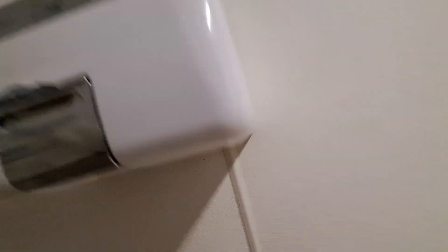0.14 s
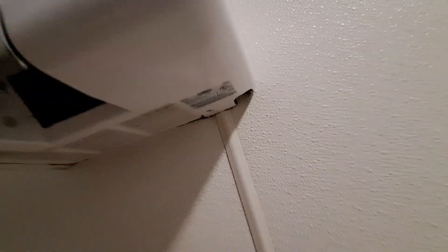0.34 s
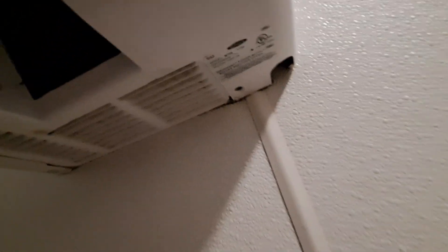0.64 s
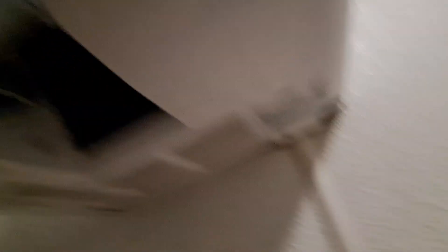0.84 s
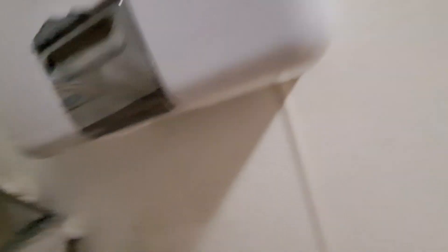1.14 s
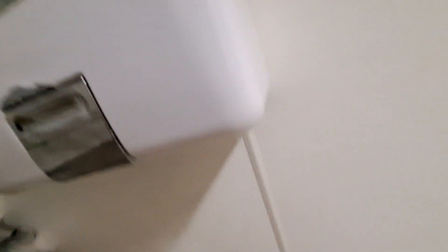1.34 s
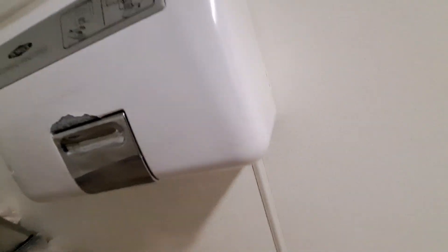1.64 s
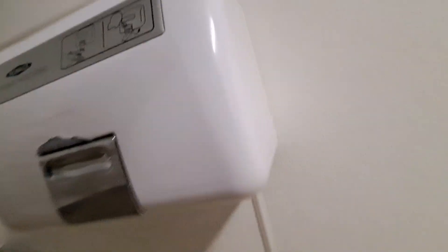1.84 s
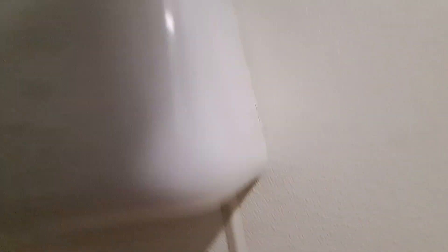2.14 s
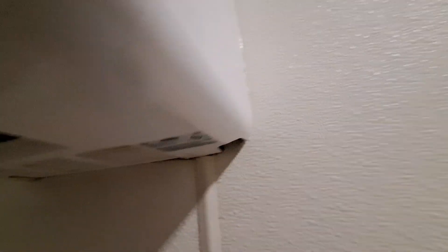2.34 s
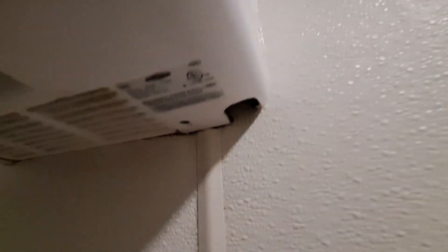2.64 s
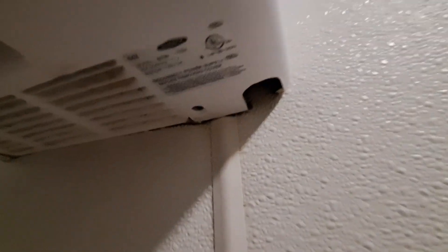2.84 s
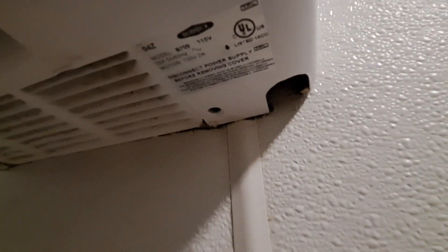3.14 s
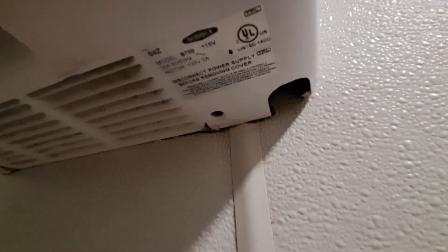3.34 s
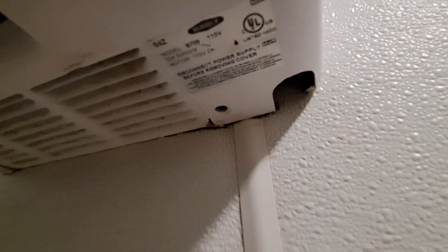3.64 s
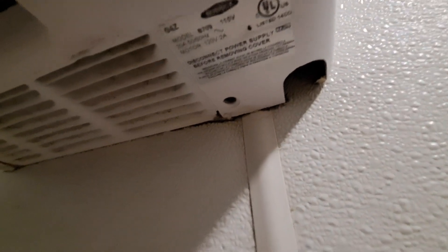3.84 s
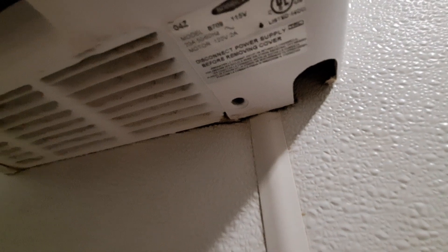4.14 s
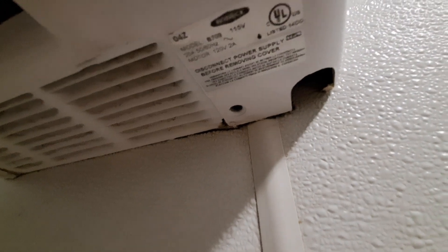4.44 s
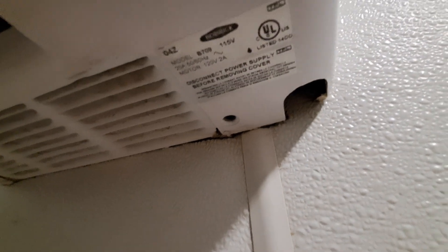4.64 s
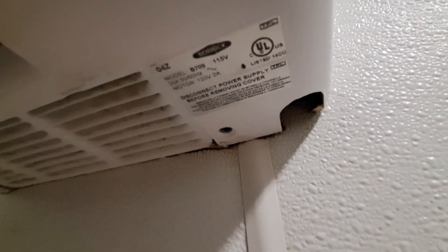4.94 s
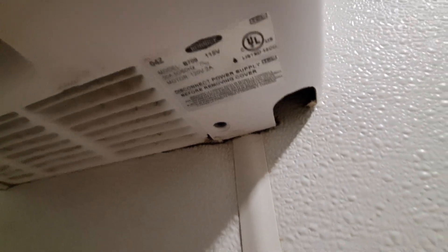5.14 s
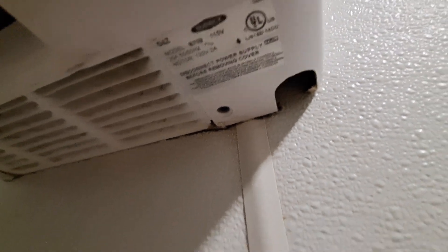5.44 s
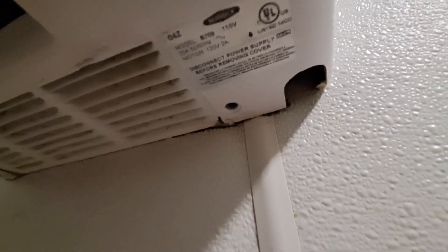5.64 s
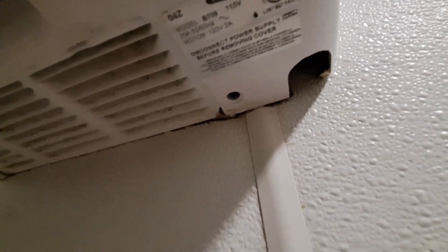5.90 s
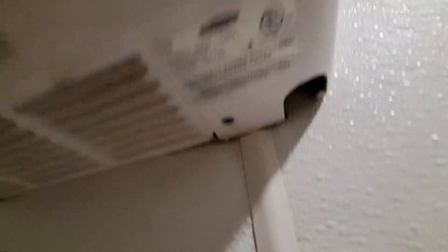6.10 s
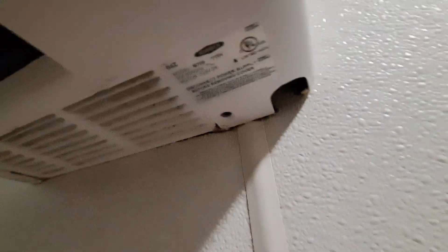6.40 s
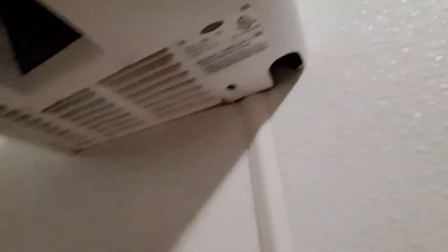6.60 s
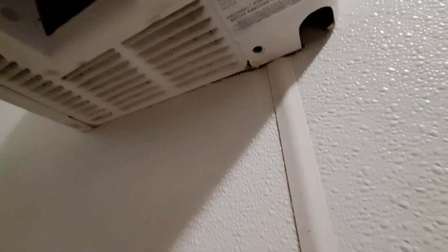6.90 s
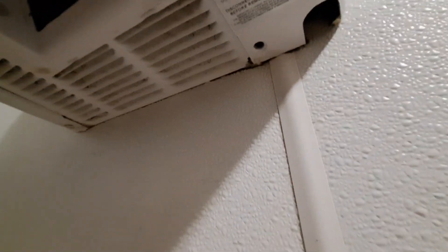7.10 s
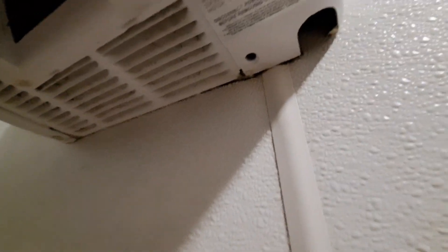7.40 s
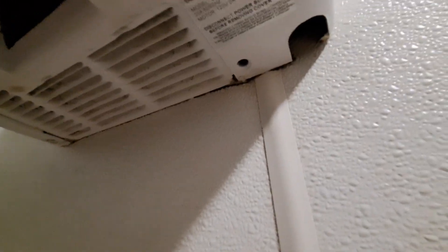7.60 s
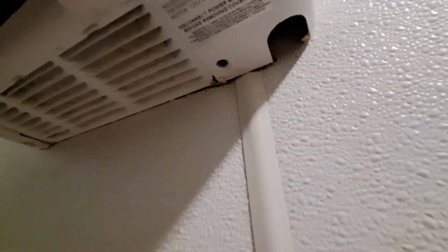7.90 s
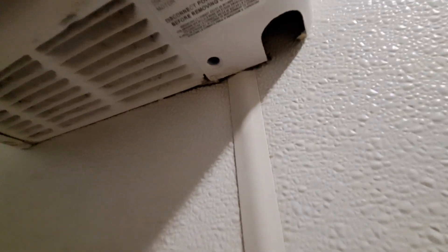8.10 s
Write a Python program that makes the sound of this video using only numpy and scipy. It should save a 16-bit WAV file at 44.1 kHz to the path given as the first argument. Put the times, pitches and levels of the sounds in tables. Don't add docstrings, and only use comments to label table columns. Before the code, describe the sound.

A restroom's steady fan drone is knocked by two handling taps before a wall dryer abruptly starts. Its turbulent jet and electric hum shift in tone as the handheld microphone moves near the outlet. The air collapses into a soft, sinking rush with thin rhythmic scrapes slowing down, leaving fan and vent louder. A second sudden start brings a fuller whistle and roar, then another slowdown.

```python
import sys
import numpy as np
from scipy import signal
from scipy.fft import rfft, irfft
from scipy.io import wavfile
from scipy.ndimage import uniform_filter1d

SR = 44100
rng = np.random.default_rng(int(sys.argv[2]) if len(sys.argv) > 2 else 0)


def to_wav(sig):
    pcm = np.clip(np.atleast_2d(sig), -1, 1) * 32767
    pcm = np.round(pcm).astype(np.int16)
    wavfile.write(sys.argv[1], SR, pcm.T)


def attenuation_scalar(level_db):
    decades = np.asarray(level_db, float) / 20
    return 10 ** decades


N = 364266
SIZE, HOP = 2048, 512
HZ = np.fft.rfftfreq(SIZE, 1 / SR)
FRAME_S = np.arange(N // HOP + 5) * HOP / SR
T = np.arange(N) / SR

# frequency in Hz, level in dB per Hz.
VENT_COLOUR_DB = [(15, -34), (25, -28), (123, -13), (148, -8.5), (174, -17), (351, -16.5), (447, -13),
                  (601, -23), (901, -34), (1310, -35), (2190, -47.5), (4920, -46), (8900, -58.5),
                  (12600, -61), (15700, -64)]
# frequency in Hz, left minus right in dB.
VENT_SIDE_DB = [(60, 11), (110, 10), (200, 5), (380, 5), (700, -2.5), (1290, -5), (2380, -8), (4400, -22),
                (8120, -9.5), (15000, -2)]
# frequency in Hz, likeness 0-1, left lead in ms.
VENT_PORTS = [(30, 0.63, 0.27), (200, 0.99, -0.022), (600, 0.81, -0.36), (1200, 0.37, -0.31),
              (3930, 0.22, -0.37), (12100, 0.11, -0.25)]
# frequency in Hz, width in Hz, level in dB.
GRILLE_MODES = [(91, 30, -2), (195, 32, -5), (9070, 1300, -8.0), (12400, 1400, 4), (734, 170, 6.5),
                (996, 114, -8.0), (1920, 180, 3.5), (3200, 990, -3.0), (15500, 1500, -6)]
# level in dB, share of the gain change, lift in the draught in dB.
VENT_LAYERS = [
    (-39, 0.63, 4),
    (-43, 1.26, 11),
    (-56, 0.76, 13),
]
DRAUGHT_END_S, DRAUGHT_FADE_S = 0.17, 0.16
# frequency in Hz, width in Hz, level in dB.
DRAUGHT_MODES = [(7200, 2800, -6.5), (12800, 2000, 6.5), (15300, 1400, 8), (11300, 900, -1)]
# start in s,
# length in s, frequency in Hz, width in Hz, level in dB.
SWING = [(0.12, .55, 7700, 1500, 6), (0.16, 0.63, 2000, 700, 5), (0.18, 0.68, 5200, 1500, -4),
         (-0.044, 0.59, 1030, 170, 7), (.2, .55, 14500, 1500, -2.5), (-0.012, 0.12, 12000, 5300, 4),
         (0.05, 0.064, 12000, 7300, -6), (.12, .1, 12500, 4000, -1)]

FAN_HZ = 24.01
# multiple of FAN_HZ, level in dB.
FAN_ORDERS_DB = [(1, -49), (2, -41), (3, -8.5), (4, -41), (5, 1.5), (6, -20.5), (7, -20.5), (8, -52),
                 (9, -20.5), (10, -8.5), (11, -15), (12, -14), (13, -15), (14, -8), (15, -10.5), (16, -43),
                 (17, -37), (18, -27.5), (19, -28), (20, -20), (21, -27), (22, -22.5), (23, -38), (24, -51),
                 (25, -14.5), (26, -28), (27, -25), (28, -24)]
# time in s, level in dB.
HUM_DB = [(0, -30.5), (.18, -26.5), (.46, -26), (.66, -25), (.85, -32), (1.4, -32), (2.0, -38), (2.65, -35),
          (2.9, -27.5), (3.86, -28.5), (4.67, -24.5), (5.3, -24), (5.9, -24.5), (6.05, -36.5), (6.6, -27.5),
          (7.4, -28.5), (7.85, -28.5), (8.26, -30.5)]
# frequency in Hz, share of the hum's level change.
HUM_FOLLOW = [(72, 1.54), (120, 1.52), (240, 2.9), (330, 1.7), (600, 0.23)]
# frequency in Hz, left minus right in dB.
HUM_SIDE_DB = [(72, 0), (120, -1.5), (240, -6), (336, 0.5), (360, -5), (600, -9)]
# start in s, length in s, fan multiple, level in dB.
STANDING_WAVES = [(3, 1.5, 6, 9), (3.2, 1.4, 11, -13), (3, 1.5, 12, -14), (3.2, 1.4, 13, -9),
                  (3, 1.3, 10, 4), (3.3, 1.3, 9, 5), (4.9, 0.99, 13, -11), (4.5, 1.4, 15, 2),
                  (4.9, 1.2, 12, 3), (4.5, 1.24, 14, -3), (-.3, 0.6, 15, 8), (-.3, .6, 10, 11),
                  (-.4, 1.4, 14, -1.5), (-.3, 0.94, 11, -3), (-0.2, .7, 12, 4.5), (-2, 1.2, 25, -5),
                  (3, 1.65, 25, -6), (0, .7, 7, -9), (1, .6, 6, -5), (5.8, .35, 10, 9), (1, 0.38, 10, 5.5)]
# time in s, level in dB.
NEAR_WALL_DB = [(0, -23), (2.9, -2), (3.4, -4.5), (4.1, -1), (4.7, 0), (5.1, 2), (5.4, 0), (5.8, -3)]
# start in s, length in s, frequency in Hz, width in Hz, level in dB.
MOAN = (4.5, 1.5, 303, 17, -39)
# frequency in Hz, width in Hz, level in dB.
GRILLE_TONES = [(1326, 8.3, -56), (1058, 20, -59)]
DUCK_S, DUCK_LENGTH_S, DUCK_DB = 0.048, 0.033, -3

# frequency in Hz, width in Hz, left minus right in dB.
RIGHT_PORT_MODES = [(3230, 690, 5.5), (6700, 2700, -9), (9930, 2740, 26), (12500, 1300, -14),
                    (15300, 1200, 10)]
# time in s, share of the cavity colour 0-1, finger over the right port in dB.
GRIP = [(0, 0.3, -5), (.6, 0.5, 3), (1.32, 0.7, 16), (1.38, 0, 11), (2.17, 0, 14), (2.22, 0.2, 0),
        (2.5, 0.8, -1), (5.8, 0.7, 5), (6.4, 0.7, 7), (6.6, 0.4, 5)]
# start in s, length in s, level in dB.
GUSTS = [(0, 0.57, -45), (6, 0.8, -34), (6.5, .5, -34), (6.5, 0.7, -32), (6.5, 0.87, -27),
         (4.5, 0.69, -50), (8, .6, -40), (4.5, 2.2, -46), (.6, 0.57, -34), (0, 0.84, -46),
         (7.5, 0.44, -30)]
CALM_DB, STIR_DB = -65, -47
# time in s, peak in dB, pitch in Hz, left minus right in dB, crack share.
TAPS = [
    (.0615, -5, 1300, 26, .17),
    (.0608, -21, 544, 23, 0),
    (.0614, -20, 3300, 20, 0),
    (.0616, -21, 5000, 20, 0),
    (.0737, -19, 1100, -3, 0),
    (.0743, -20, 4480, -6, 0),
    (.0757, -21, 1800, -3, 0),
    (.603, -26, 600, 0, .05),
    (5.86, -20, 800, 0, .052),
]

STARTS_S = [
    .603,
    5.858,
]
COASTS_S = [
    2.764,
    7.66,
]
STOPS_S = [
    3.32,
    7.78,
]
# start in s, length in s, level in dB.
FALTERS = [(5.955, 0.027, -2)]
SPIT_DELAY_S, SPIT_DB = [.011, .014], [-21, -22]

# time in s, level in dB.
SCRAPE_DB = [(2.95, -47), (3.15, -42), (3.4, -41.5), (3.8, -48.5), (4.3, -54), (4.75, -55), (4.85, -75)]
# frequency in Hz, level in dB.
SCRAPE_COLOUR_DB = [(3000, -39), (7500, -18), (8500, -32), (9300, -15), (10500, -11), (11800, -18),
                    (13000, -11), (15800, -14.5)]
SECOND_COAST_LATER_S = 4.97
ROTOR_S, ROTOR_TURNS, ROTOR_DECAY_S = 3.211, 56, 1.15

# frequency in Hz, climb in Hz per s, level in dB, growth in dB per s.
EDGE_TONE = [
    (1492, 43, -42, 4.5),
    (1510, 61, -31, 0),
]
TONE_RISE_S, TONE_SAG_HZ_PER_S, TONE_FADE_DB_PER_S = 0.32, 135, 29

SHAFT_HZ, SHAFT_LAG_HZ, SHAFT_SETTLE_S, SHAFT_HEARD_S = 100.6, 38, .35, 0.52
# imbalance in dB, fifth order in dB.
SHAFT_DB = [
    (-30.5, -31),
    (-32, -30),
]
SHAFT_LINGER_S, SHAFT_UNDER_SHARE = 0.11, 0.5
COVER_HZ, COVER_WIDTH_HZ, COVER_DB = 475.5, 20, [5.5, 10.5]
# time in s, fourth order in dB, third order in dB, loose rattle in dB.
LOCK = [(.6, 3, -22, -1), (.66, -6, -20, -3.5), (.72, 2, -3, -1.5), (.8, -5, -12, -2), (.9, -1.5, -21, -5),
        (1.0, -8, -18, -4), (5.86, -11, -12, 0.5), (5.95, -17, -7, 1), (6.0, -4, -6, -6.5),
        (6.1, -3.5, -12, -5.5), (6.2, -0.5, -19, -11), (6.33, -14, -21, -3)]
# time in s, rise in s, held until s after, level in dB.
SURGES = [
    (.603, .0045, .345, -19.5),
    (5.858, .17, .4, -14.5),
]
SURGE_FALL_DB_PER_S, SURGE_FALTER_POWER = 95, 3.8
RUNNING_DB = -35

AIR_HZ = [210, 1100, 4500, 11000]
# frequency in Hz, level in dB per Hz.
JET_COLOUR_DB = [(15, -55), (25, -29), (86, -15.5), (126, -18), (210, -6.5), (324, -16), (485, -12.5),
                 (688, -14.5), (1180, -22.5), (1590, -19.5), (2870, -27.5), (4790, -22.5), (9150, -36.5),
                 (12600, -47.5), (15700, -54.5)]
# frequency in Hz, left minus right in dB.
JET_SIDE_DB = [(60, -7), (110, -5.5), (200, -7.5), (380, -8.5), (700, -13), (1290, -10), (2380, -7),
               (4400, -11), (8120, -5.5), (15000, -0.5)]
# frequency in Hz, width in Hz, level in dB.
DUCT_MODES = [(147, 28, 10), (210.2, 16.5, 9.5), (289.6, 20.7, 11), (403, 110, 5.5), (1030, 326, 8.5),
              (1304, 29, 6.5), (2320, 760, 4), (3480, 600, -2.5), (3970, 810, 3.5), (7030, 830, -2),
              (9320, 3200, -10), (12860, 1800, 6.5)]
# frequency in Hz, likeness 0-1, left lead in ms.
JET_PORTS = [(30, .3, 0), (100, .7, 0), (220, .95, .1), (400, .82, .17), (700, .64, .3), (1400, .53, .42),
             (2400, .42, .5), (5000, .28, .5), (12000, .22, .55)]
# full level in dB, short at switch-on in dB, slowing time in s, loss in dB per tenfold.
JET_LAYERS = [
    (-18, -5.5, 1, 64.5),
    (-25, -0.1, 0.5, 48),
    (-26.5, -5, 0.16, 19),
    (-30, -2, 0.2, 27),
]
SPIN_UP_S, HALT_S, HALT_DB_PER_S = 0.23, 1.8, 32
COAST_KNEE_S = 0.039
# time in s, under the housing in dB, facing the outlet in dB, turn in dB, tilt in dB.
HOLD = [(.63, -12, -4, -8, 2), (.88, 4, 1.5, -5.5, -5), (1.03, -3, 1, -18, -14), (1.27, -5, 1, -19, -17),
        (1.38, 4.5, -8, -25, 0), (1.6, 6.5, -5, -26, -1), (2.1, 2, -0.5, -20, 3), (2.27, 5, 4, -13.5, -5),
        (2.43, 9, 2, -10, 3), (2.6, 13.5, 1.5, -11, 8), (3.3, -3, 5, -11, 5.5), (4.4, 10, 3, -13, 7),
        (5.88, -8, 0.5, -12, 2), (6.2, 0.1, 1, -8, 1.5), (6.5, -1, 5, -11.5, -4.5),
        (7.35, 8.5, 4.5, -10, -3), (7.7, -1.5, 2, -12, -1), (8.26, -5, 8, -11, -3)]
UNDER_SHARE, FACING_SHARE = [0.25, -0.083, -0.012, -0.15], [0.5, -0.18, -0.13, 0.83]
RUSH_SIDE_DB, RUSH_TURN_SHARE = 0.8, 0.17
# start in s, length in s, frequency in Hz, width in Hz, level in dB.
GLANCES = [(0.9, 0.33, 1240, 330, 6.5), (0.68, 0.58, 360, 130, 5), (1.68, 0.77, 1060, 170, 5),
           (2.2, 0.77, 2300, 300, 6), (0.35, 0.7, 2400, 780, -3), (1.29, 1.25, 6900, 1200, -6),
           (0.85, 1.3, 10400, 1700, 5), (0.87, 0.56, 10200, 2100, -8), (1.36, 1.1, 13000, 1800, -7),
           (0.49, 0.51, 3880, 290, 5.5), (0.49, 0.48, 6900, 600, 6), (0.63, 0.41, 5400, 1100, -5),
           (0.53, 0.48, 1480, 320, 5.5), (0.65, 0.66, 640, 82, -8), (0.87, 0.36, 7600, 900, 5),
           (.9, 0.39, 1050, 200, 1.5), (1.06, 0.35, 3700, 500, -2.5), (1, 0.39, 2000, 500, -1.5),
           (1.3, .9, 4800, 800, 0.5), (0.76, 2.3, 3070, 1150, 3), (2.11, 0.3, 7300, 900, 8),
           (2.9, 2, 3300, 450, -6), (1.2, 0.76, 130, 64, -4), (2.09, 0.97, 1340, 190, 5.5),
           (1.64, 0.42, 198, 54, -5), (0.56, 0.18, 5300, 4500, -7.5), (0.52, .4, 3600, 300, -2),
           (.55, 0.37, 9300, 1500, 4), (0.5, 0.38, 1640, 180, -7), (2.76, 0.78, 2350, 250, 3),
           (2.4, 0.97, 7900, 1400, -4), (2.2, 1.9, 11700, 600, -2), (2.16, .8, 12600, 1500, 2.5),
           (0.9, 0.54, 275, 44, 2.5), (0.86, .4, 410, 75, 0), (3.2, 0.75, 160, 78, -8),
           (3.1, .9, 226, 30, 3), (2.62, 0.48, 720, 380, -3.5), (.72, 0.21, 190, 40, 5),
           (1.64, 0.3, 540, 200, -4.5), (0.92, 0.37, 390, 120, 2), (.8, 0.32, 275, 30, 3.5),
           (.95, .35, 1090, 60, 5)]
# start in s, length in s, frequency in Hz, width in Hz, level in dB.
LATER_GLANCES = [(5.8, 0.32, 5500, 550, 3), (5.7, 0.7, 7800, 500, -6), (5.73, .6, 9900, 1100, 4.5),
                 (5.65, .6, 12000, 1500, -5), (6.1, 1.15, 3500, 1100, 4), (6.2, 0.6, 2200, 800, 2.5),
                 (6.3, .9, 12400, 500, -4), (6.6, 1.5, 6350, 700, -4.5), (6.8, 1.1, 8400, 500, 2),
                 (6.9, 0.83, 7100, 500, 4.5), (6.9, 0.92, 15300, 1200, 4), (6.1, 1.16, 220, 23, -6),
                 (5.92, 0.72, 250, 61, 3), (5.2, 0.44, 100, 120, 4), (7.9, 1.1, 770, 190, -3),
                 (7.7, 0.68, 290, 120, 3.5), (6.24, 1.2, 580, 80, 5), (6.95, 0.59, 256, 68, -5),
                 (8.2, 0.33, 210, 54, -2), (5.75, 0.48, 3900, 680, 7), (5.8, 0.41, 2900, 1100, -5),
                 (5.3, 0.28, 1700, 1500, 5), (6.24, 0.63, 353, 82, 3.5), (7.06, 1.5, 297, 28, 7),
                 (6.95, 0.5, 150, 60, -5), (6.2, .45, 291, 80, 2.5), (6.3, 0.36, 200, 40, -4.5),
                 (6.35, 0.44, 487, 30, 5), (6.0, .35, 150, 50, 4), (6.3, .6, 160, 87, 3),
                 (7.3, 1.1, 710, 65, -3)]
# time in s, level in dB.
KICKS = [(.657, 5.5), (.708, 4), (.83, 2.5), (.99, 1.5), (5.93, 3), (5.948, 4.5), (5.996, 3.5)]
KICK_S = 0.0087
EDGE_HZ = 15850


def evened(x):
    return x / np.sqrt(np.mean(x ** 2) + 1e-20)


def read(points, hz, axis=1):
    p = np.asarray(points, float)
    return np.interp(np.log(hz + 1), np.log(p[:, 0] + 1), p[:, axis])


def curve(rows, t, axis=1):
    p = np.asarray(rows, float)
    return np.interp(t, p[:, 0], p[:, axis])


def across(centres_hz, levels_db):
    tents = np.array([read(list(zip(centres_hz, row)), HZ) for row in np.eye(len(centres_hz))])
    return tents.T @ np.array(levels_db)


def sides(pan_db):
    g = attenuation_scalar(np.array([pan_db / 2, -pan_db / 2]))
    return g / np.sqrt((g ** 2).mean(0))


def band_db(colour_db, lo_hz, hi_hz):
    return 10 * np.log10(np.sum(attenuation_scalar(colour_db[(HZ > lo_hz) & (HZ < hi_hz)]) ** 2))


def bumps(modes):
    return sum(db / (1 + (2 * (HZ - f) / w) ** 2) for f, w, db in modes)


def swell(t, s, length):
    return np.sin(np.pi * np.clip((t - s) / length, 0, 1)) ** 2


def glances(rows):
    return sum(np.outer(bumps([mode]), swell(FRAME_S, s, length)) for s, length, *mode in rows)


def wander(rate_hz):
    lowpass = signal.butter(2, rate_hz, fs=SR / 128, output="sos")
    coarse = signal.sosfilt(lowpass, rng.standard_normal(N // 128 + 2))
    return np.interp(np.arange(N) / 128, np.arange(len(coarse)), evened(coarse))


def smooth_chance(bins, frames):
    field = rng.standard_normal((len(FRAME_S), len(HZ))).T
    field = uniform_filter1d(field, size=bins, axis=0)
    return evened(uniform_filter1d(field, size=frames, axis=1))


def whistle(hz, width_hz, order=2):
    r = np.exp(-np.pi * width_hz / SR)
    slow = rng.standard_normal(N) + 1j * rng.standard_normal(N)
    for _ in range(order):
        slow = signal.lfilter([1 - r], [1, -r], slow)
    turns = np.cumsum(hz * np.ones(N)) / SR
    return evened((slow * np.exp(2j * np.pi * turns)).real)


def clocks(t):
    run = (t > 5.5).astype(int)
    on_s = np.maximum(t - np.take(STARTS_S, run), 0)
    off_s = np.maximum(t - np.take(COASTS_S, run), 0)
    return run, on_s, off_s


def falter():
    return attenuation_scalar(sum(db * uniform_filter1d(1. * (T > s) * (T < s + length), size=200)
                   for s, length, db in FALTERS))


def right_port():
    top = 1 / (1 + (12400 / (HZ + 1)) ** 16)
    cavity_db = np.outer(bumps(RIGHT_PORT_MODES), curve(GRIP, FRAME_S))
    return cavity_db + np.outer(top, curve(GRIP, FRAME_S, axis=2))


def air_noise(field_db, pan_db, ports, patchy_db, ripple_db):
    a, b, c, d = rng.standard_normal((len(FRAME_S), len(HZ), 4)).T
    same = np.clip(read(ports, HZ), 0, 1)[:, None]
    lag = np.exp(-2j * np.pi * HZ * read(ports, HZ, axis=2) / 1000)[:, None]
    left = a + 1j * b
    right = same * lag * left + np.sqrt(1 - same ** 2) * (c + 1j * d)
    z = np.array([left, right])
    z *= np.sqrt(2 / (1 + same * lag.real))
    patches = smooth_chance(16, 6)
    ripple = smooth_chance(3, 70)
    ripple *= read([(1500, 1), (5000, .45)], HZ)[:, None]
    z *= attenuation_scalar(field_db + patchy_db * patches + ripple_db * ripple) * sides(pan_db + right_port())
    return signal.istft(z, nperseg=SIZE, noverlap=SIZE - HOP)[1][:, :N] * np.sqrt(2 / 3)


def vent():
    colour_db = read(VENT_COLOUR_DB, HZ) + bumps(GRILLE_MODES)
    edges_hz = [(400, 580), (2000, 7000), (8000, 15000)]
    draught = np.clip(1 - (FRAME_S - DRAUGHT_END_S) / DRAUGHT_FADE_S, 0, 1)
    gain_db = curve(HUM_DB, FRAME_S) + 24.7
    levels_db = [db + share * gain_db + lift * draught - band_db(colour_db, *e)
                 for (db, share, lift), e in zip(VENT_LAYERS, edges_hz)]
    field_db = colour_db[:, None] + across([500, 2500, 11000], levels_db)
    field_db += np.outer(bumps(DRAUGHT_MODES), draught) + glances(SWING)
    return air_noise(field_db, read(VENT_SIDE_DB, HZ)[:, None], VENT_PORTS, patchy_db=.8, ripple_db=1.4)


def fan():
    level_db, wall_db = curve(HUM_DB, T), curve(NEAR_WALL_DB, T)
    out = np.zeros((2, N))
    for (k, db), phase in zip(FAN_ORDERS_DB, rng.random(len(FAN_ORDERS_DB))):
        hz = k * FAN_HZ
        unsteady_db = .6 + .3 * max(-db - 19, 0)
        moved_db = sum(d * swell(FRAME_S, s, length) * (round(order) == k)
                       for s, length, order, d in STANDING_WAVES)
        line_db = db - 24.5 + read(HUM_FOLLOW, hz) * (level_db + 24.5) + np.interp(T, FRAME_S, moved_db)
        line_db += unsteady_db * (wander(1.4) - 2.5) + wall_db * (hz > 390)
        line = attenuation_scalar(line_db) * np.sin(2 * np.pi * (hz * T + phase))
        out += np.sqrt(2) * sides(read(HUM_SIDE_DB, hz))[:, None] * line
    for hz, width_hz, db in GRILLE_TONES:
        tone_db = db + level_db + 25.0 + wall_db + 2.8 * wander(0.46)
        out += attenuation_scalar(tone_db) * whistle(hz, width_hz, order=1)
    out += attenuation_scalar(MOAN[4]) * swell(T, *MOAN[:2]) * whistle(*MOAN[2:4])
    return out * attenuation_scalar(DUCK_DB * np.sin(np.pi * np.clip((T - DUCK_S) / DUCK_LENGTH_S, 0, 1)))


def taps():
    out, t = np.zeros((2, N)), np.arange(300) / SR
    for s, db, hz, pan_db, crack in TAPS:
        cycles = 2.6 if hz > 3000 else 1
        swing = -np.sin(2 * np.pi * hz * t) * np.exp(-((t * hz / cycles - .6) / .45) ** 2)
        grit = uniform_filter1d(rng.standard_normal(len(t)), size=2) * np.exp(-t / 0.0031)
        at = round(s * SR)
        out[:, at:at + len(t)] += attenuation_scalar(db) * sides(pan_db)[:, None] * (swing + crack * grit)
    return out


def gusts():
    band = signal.butter(3, [36, 80], "bandpass", fs=SR, output="sos")
    lumps = evened(signal.sosfilt(band, rng.standard_normal((2, N))))
    level = attenuation_scalar(CALM_DB) + attenuation_scalar(STIR_DB) * np.exp(-clocks(T)[2] / 0.5)
    level += sum(attenuation_scalar(db) * swell(T, s, length) for s, length, db in GUSTS)
    return level * attenuation_scalar(1.6 * wander(1.3)) * attenuation_scalar(np.array([[4.], [-6.]])) * lumps


def brushes():
    envelope = np.zeros(N)
    for shift_s in (0, SECOND_COAST_LATER_S):
        t = T - shift_s
        turn = (ROTOR_TURNS * (1 - np.exp((ROTOR_S - t) / ROTOR_DECAY_S)) + 0.13) % 1
        pulse = turn / 0.039 * np.exp(1 - turn / 0.08)
        envelope += attenuation_scalar(curve(SCRAPE_DB, t)) * (t > SCRAPE_DB[0][0]) * pulse
    colour = attenuation_scalar(read(SCRAPE_COLOUR_DB, np.fft.rfftfreq(N, 1 / SR)))
    scrape = evened(irfft(rfft(rng.standard_normal((2, N))) * colour, N))
    envelope *= attenuation_scalar(.9 * wander(12) - 4)
    return envelope * scrape * attenuation_scalar(np.array([[5.5], [-5.]]))


def nozzle():
    run, on_s, off_s = clocks(T)
    base_hz, climb, db, growth = np.array(EDGE_TONE)[run].T
    hz = base_hz + climb * on_s - TONE_SAG_HZ_PER_S * np.minimum(off_s, 1)
    hz *= 1 + 0.013 * wander(5.0)
    level_db = db + growth * on_s + 1.1 * wander(7.0) - TONE_FADE_DB_PER_S * off_s
    level = np.minimum(on_s / TONE_RISE_S, 1) ** 2 * attenuation_scalar(level_db)
    fuzz = whistle(hz, 146)
    core = whistle(hz, 45)
    tone = level * (.85 * fuzz + .45 * core)
    return np.array([tone, 0.97 * np.roll(tone, 22)])


def motor():
    out = np.zeros(N)
    run, on_s, off_s = clocks(T)
    fade = np.clip(np.minimum(on_s - SHAFT_HEARD_S, SHAFT_LINGER_S - off_s) / 0.066, 0, 1)
    speed_hz = SHAFT_HZ - SHAFT_LAG_HZ * np.exp(-on_s / SHAFT_SETTLE_S)
    speed_hz *= 1 + 0.001755 * wander(5.3)
    turns = np.cumsum(speed_hz) / SR
    for order, db in zip((1, 5), np.transpose(SHAFT_DB)):
        level_db = db[run] + SHAFT_UNDER_SHARE * curve(HOLD, T) + 0.89 * wander(36)
        detune = 2 * (order * speed_hz - COVER_HZ) / COVER_WIDTH_HZ
        level_db += np.take(COVER_DB, run) / (1 + detune ** 2)
        out += fade * attenuation_scalar(level_db) * np.sqrt(2) * np.sin(2 * np.pi * order * turns)

    strain = np.zeros(N)
    for s, rise_s, held_s, db in SURGES:
        fall_db = SURGE_FALL_DB_PER_S * np.maximum(T - s - held_s, 0)
        strain += np.clip((T - s) / rise_s + 0.38, 0, 1) * attenuation_scalar(db - fall_db)
    strain *= falter() ** SURGE_FALTER_POWER
    fourth, third = (np.sqrt(2) * np.sin(2 * np.pi * hz * T) for hz in (480, 360))
    fourth_db, third_db, rattle_db = (curve(LOCK, T, axis=k) for k in (1, 2, 3))
    rattle = whistle(485, 90)
    rattle += 0.52 * whistle(406, 60)
    buzz = (attenuation_scalar(fourth_db) * fourth + attenuation_scalar(third_db) * third) * attenuation_scalar(1.1 * wander(26))
    out += strain * (buzz + attenuation_scalar(rattle_db) * rattle)

    fed = np.clip((STOPS_S[0] - T) / 0.31, 0, 1)
    fed += (T > STARTS_S[1]) * np.clip((STOPS_S[1] - T) / 0.07, 0, 1)
    out += attenuation_scalar(RUNNING_DB + 2.0 * wander(1.0)) * fed * (fourth + .25 * third)
    return np.array([attenuation_scalar(-4.0) * out, attenuation_scalar(-2.0) * np.roll(out, 10)])


def jet():
    _, on_s, off_s = clocks(FRAME_S)
    under_db, facing_db, turn_db, tilt_db = (curve(HOLD, FRAME_S, axis=k) for k in (1, 2, 3, 4))
    colour_db = read(JET_COLOUR_DB, HZ) + bumps(DUCT_MODES)
    edges_hz = [(130, 330), (560, 2500), (2800, 7000), (7500, 15500)]
    spin_up = np.exp(-(on_s / SPIN_UP_S) ** 2)
    halt_db = HALT_DB_PER_S * np.maximum(off_s - HALT_S, 0)
    slowed_s = off_s ** 2 / (off_s + COAST_KNEE_S)
    levels_db = []
    for (full_db, short_db, slowing_s, loss_db), under, facing, e in zip(
            JET_LAYERS, UNDER_SHARE, FACING_SHARE, edges_hz):
        level_db = full_db + short_db * spin_up - loss_db * np.log10(1 + slowed_s / slowing_s) - halt_db
        level_db += under * under_db + facing * facing_db
        levels_db.append(level_db - band_db(colour_db, *e))
    aims_db = (RUSH_SIDE_DB + RUSH_TURN_SHARE * turn_db, turn_db, tilt_db)
    pans_db = [p - read(JET_SIDE_DB, f) for p, f in zip(aims_db, AIR_HZ[1:])]
    pan_db = read(JET_SIDE_DB, HZ)[:, None] + across(AIR_HZ[1:], pans_db)
    field_db = colour_db[:, None] + across(AIR_HZ, levels_db)
    field_db += glances(GLANCES) + glances(LATER_GLANCES)
    air = air_noise(field_db, pan_db, JET_PORTS, patchy_db=1.0, ripple_db=1.7)
    lurch_db = sum(db * np.exp(-((T - s) / KICK_S) ** 2) for s, db in KICKS)
    return air * attenuation_scalar(lurch_db + 0.53 * wander(46))


def switch(x):
    split = signal.butter(2, 4500, fs=SR, output="sos")
    low = signal.sosfiltfilt(split, x)
    high = x - low
    gate, late, spit = np.zeros(N), np.zeros(N), np.zeros(N)
    for s, stop_s, delay_s, db in zip(STARTS_S, (5.25, 9), SPIT_DELAY_S, SPIT_DB):
        jump = np.clip((T - s) / .002, 0, 1) * (T < stop_s)
        gate += jump * (0.57 + 0.5 * np.clip((T - s) / 0.042, 0, 1))
        since_s = T - s - delay_s
        late += jump * (.22 + .78 * np.clip(since_s / .003, 0, 1))
        spit += attenuation_scalar(db) * np.clip(since_s / 0.0015, 0, 1) * np.exp(-np.clip(since_s, 0, 1) / 0.0063)
    band = signal.butter(3, [8000, 14500], "bandpass", fs=SR, output="sos")
    hiss = signal.sosfilt(band, rng.standard_normal((2, N)))
    return gate * falter() * low + late * high + spit * evened(hiss)


def scene():
    dryer = switch(jet() + motor() + nozzle())
    return vent() + fan() + taps() + gusts() + brushes() + dryer


def band_limit(x):
    return signal.sosfilt(signal.butter(12, 15830, fs=SR, output="sos"), x)


def record(dry):
    cut = signal.sosfilt(signal.butter(3, 34, "highpass", fs=SR, output="sos"), dry)
    edge = signal.firwin(511, EDGE_HZ, window=("kaiser", 9), fs=SR)
    mix = signal.oaconvolve(cut, edge[None], "same")
    return band_limit(mix)


dry = scene()
out = record(dry)
to_wav(out)
```